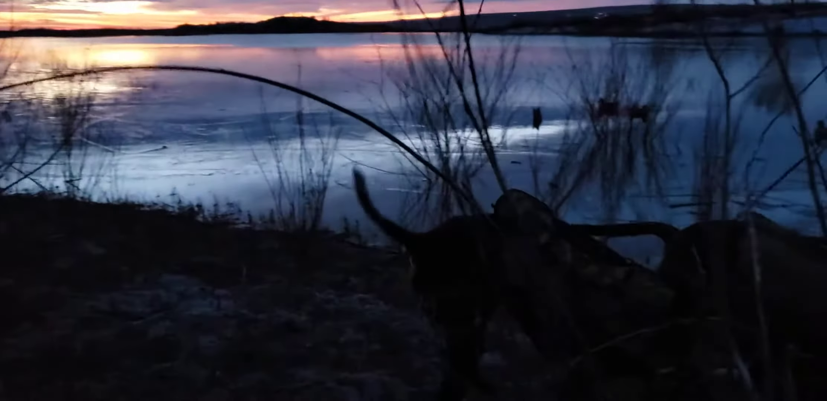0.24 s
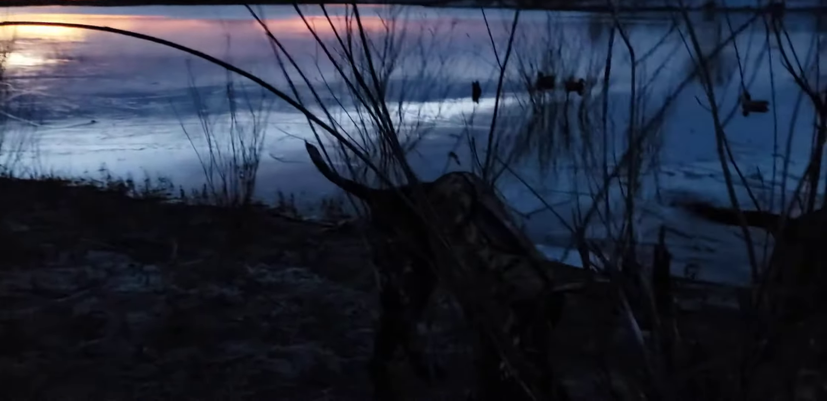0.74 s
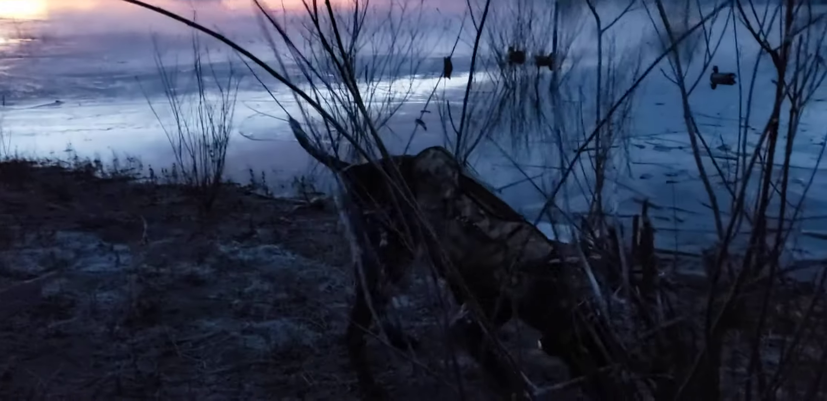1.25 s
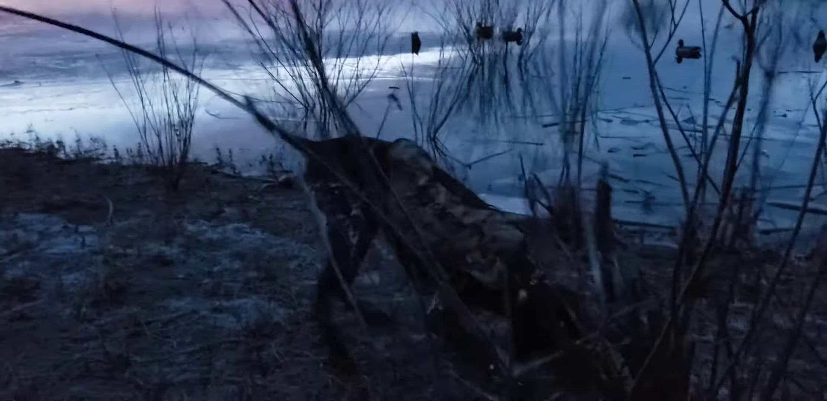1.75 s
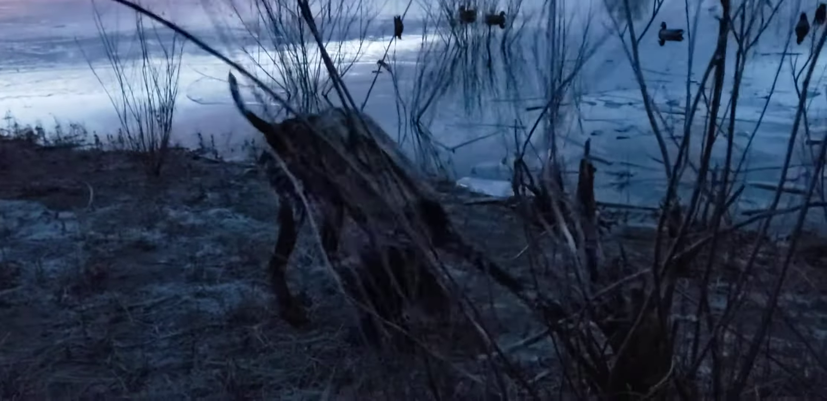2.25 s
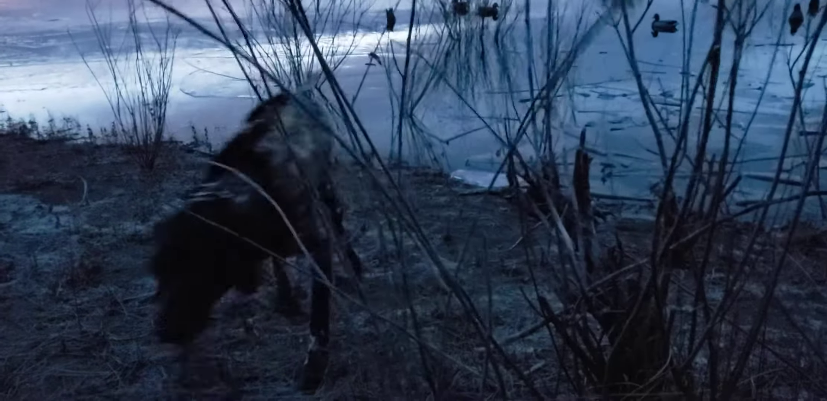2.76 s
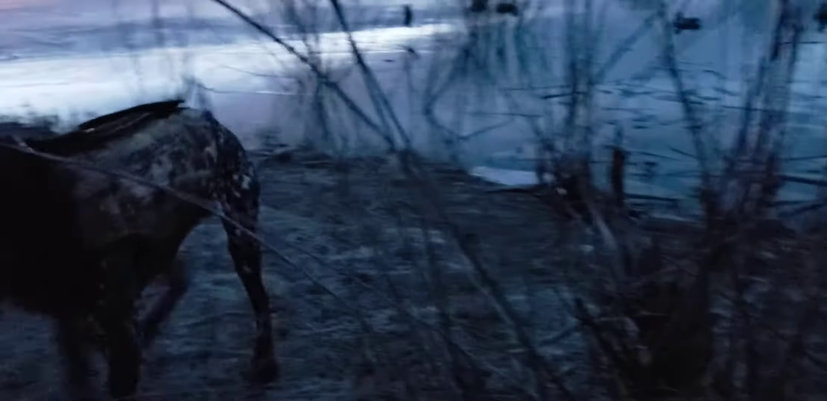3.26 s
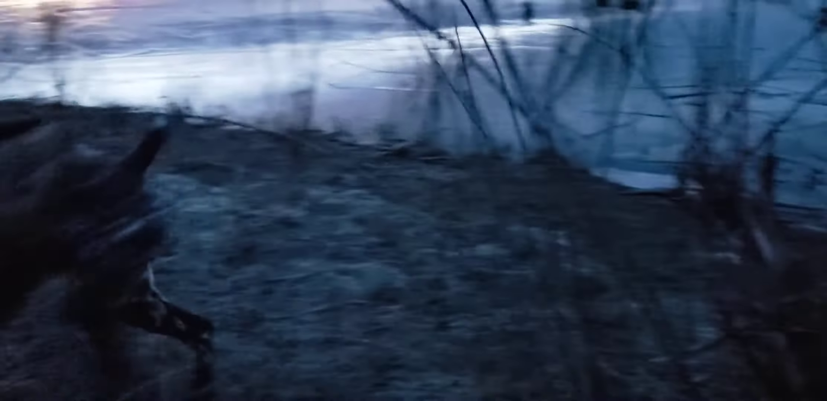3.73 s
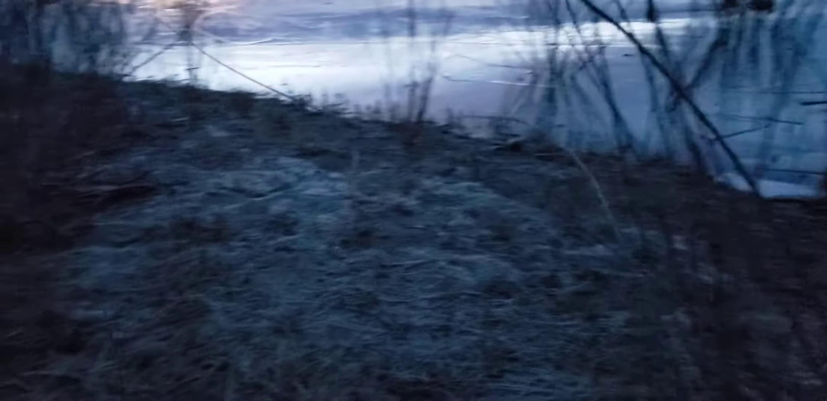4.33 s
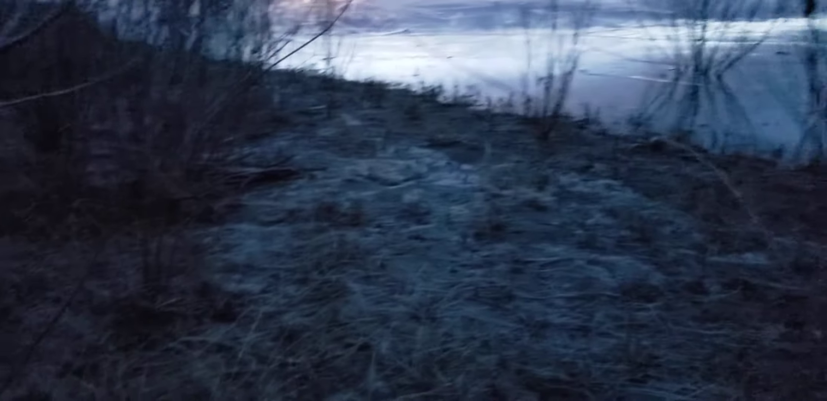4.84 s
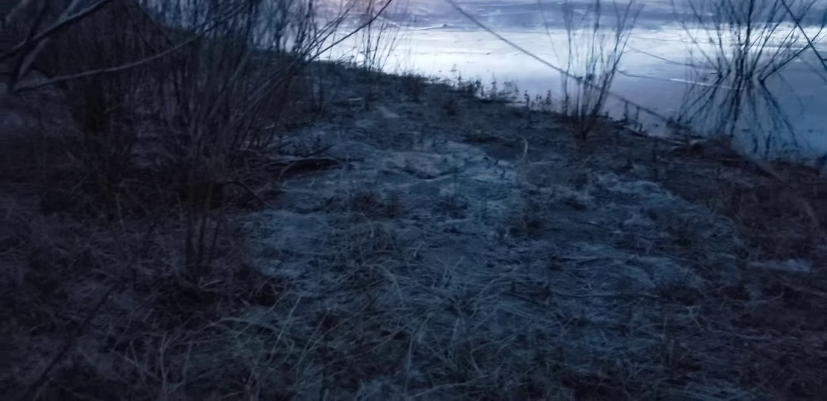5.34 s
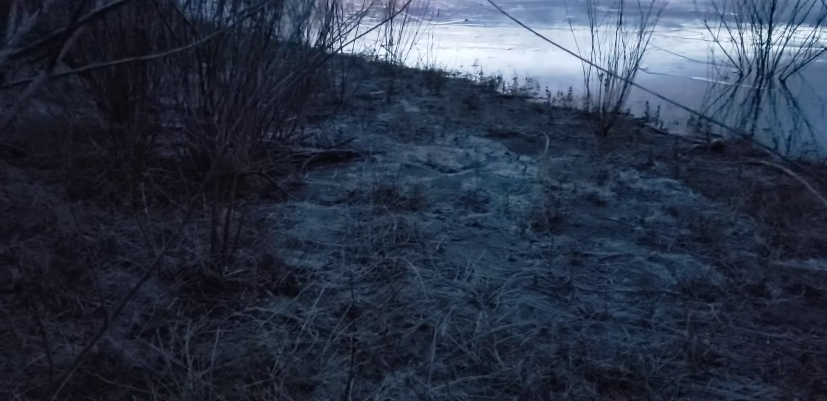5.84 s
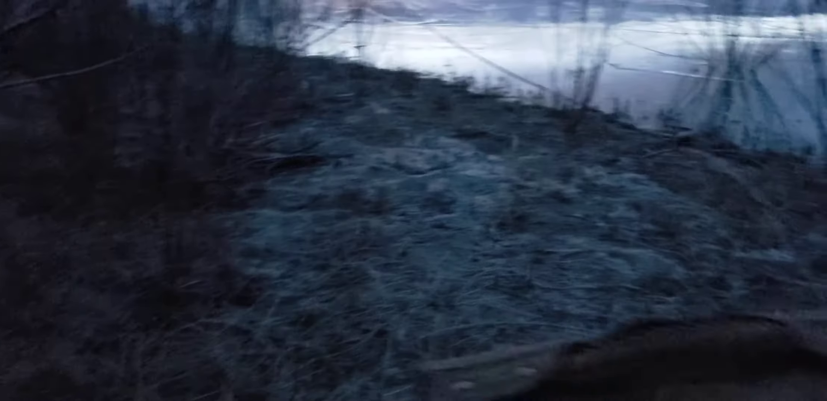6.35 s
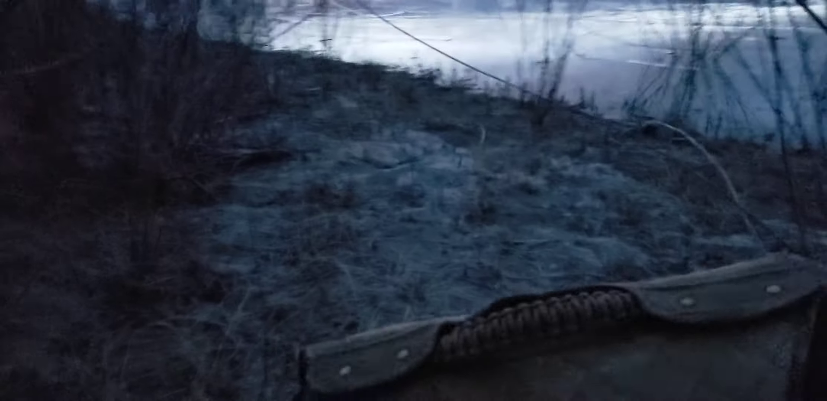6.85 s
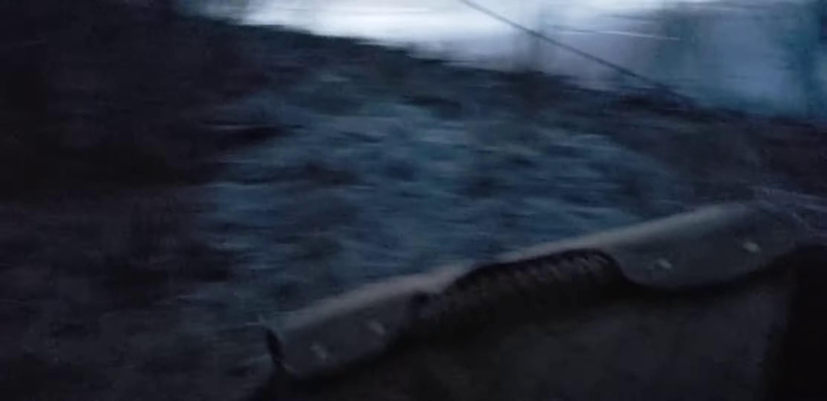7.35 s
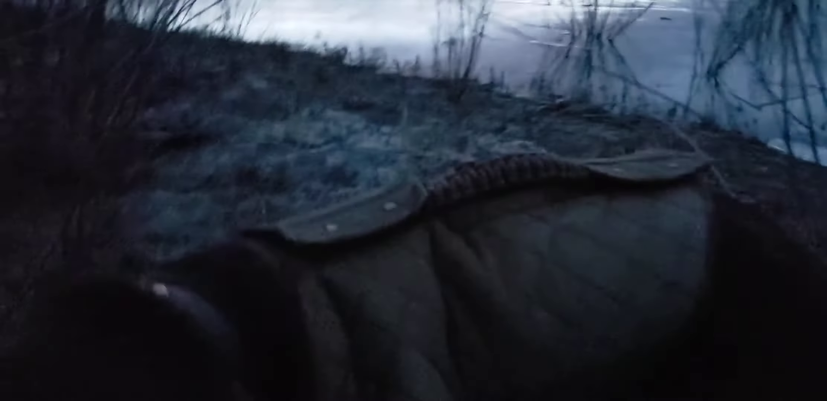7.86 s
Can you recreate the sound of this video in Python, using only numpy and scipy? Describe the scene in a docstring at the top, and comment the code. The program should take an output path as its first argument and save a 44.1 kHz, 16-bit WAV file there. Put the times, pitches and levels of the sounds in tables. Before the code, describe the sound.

Outdoors on a still, frosty shore, dogs push through stiff grass and dry brush close to hand-held stereo microphones. From 0 to 1.5 s there is light, bright rustling, small twig snaps and soft low thumps. At about 1.7 s one sharp, loud crack lands with a heavy thump and a trail of smaller snaps, thinning into a quieter stretch from 2.3 to 3 s. Around 3.15 and 3.3 s stems tear and pop. From 3.6 to 4.5 s crackling becomes dense and brittle, reaching the left microphone first, with strong snaps near 4.8 and 4.9 s. From 5 to 7 s uneven crunches and icy sizzle come in smaller pushes, with dull thumps beneath. Rustling swells again after 7 s; a hollow coat rub and deeper thump stand out near 7.75 s, ending around 8 s. Faint air and hiss remain throughout.

```python
"""Dogs push through frost-stiff grass and dry brush on a lake shore, close to a hand-held pair of microphones.
Blades and stems crackle in dense noise grains; single stems snap with a click, a sizzle and a ringing knock.
Paws and the carrier's moves thump low, coats rub along stems, thick stems pop, and air and hiss lie beneath.
The brush stays near the front, reaches the left microphone clearly first from 3.5 s, then drifts back."""
import sys
import numpy as np
from scipy import signal
from scipy.fft import rfft, irfft, next_fast_len
from scipy.io import wavfile
from scipy.ndimage import uniform_filter1d

SR = 44100
rng = np.random.default_rng(int(sys.argv[2]) if len(sys.argv) > 2 else 0)


def bounce(signal):
    """Save signal as a 16-bit WAV file at the path given by the first command-line argument."""
    frames = np.transpose(np.atleast_2d(signal))
    limited = np.clip(frames, -1, 1)
    pcm = np.round(limited * 32767).astype(np.int16)
    wavfile.write(sys.argv[1], SR, pcm)


N = 356769


def amp(db):
    """Amplitude for a level in dB."""
    return 10 ** (np.asarray(db) / 20)


def unit(x):
    """x scaled to rms 1."""
    return x / np.sqrt(np.mean(x ** 2) + 1e-20)


def curves(rows):
    """One value per sample for each column after the time."""
    s, *cols = np.transpose(rows)
    return [np.interp(np.arange(N) / SR, s, c) for c in cols]


def along(points, hz):
    """(Hz, value) points read on a log frequency axis."""
    f, v = np.transpose(points)
    return np.interp(np.log(hz + 1), np.log(f + 1), v)


def filtered(x, response):
    """x times a response of frequency."""
    m = next_fast_len(N + 8192)
    return irfft(rfft(x, m) * response(np.fft.rfftfreq(m, 1 / SR)), m)[..., :N]


def coloured(x, spectrum):
    """x shaped by (Hz, dB) points; white noise keeps its rms."""
    return filtered(x, lambda hz: unit(amp(along(spectrum, hz))))


def sides(db):
    """Left and right gains for a level difference."""
    return amp(np.array([db, -db]) / 2)


def pair(alike, lead_ms):
    """White noise at two microphones: a shared part, lead_ms earlier on the left, and a part of their own."""
    alike = np.clip(alike, 0, 1)
    shared = rng.standard_normal(N + 200)
    at = np.arange(N) + 100
    lead = np.round(lead_ms * SR / 1000).astype(int)
    both = np.array([shared[at + lead], shared[at]])
    return np.sqrt(alike) * both + np.sqrt(1 - alike) * rng.standard_normal((2, N))


def grains(per_s, spread_db, t60, bed, rise=.001):
    """Envelope of rms 1: many small breaks, a few of them strong, each dying away, over a smooth bed."""
    chance, size = rng.random((2, N))
    starts = (chance < per_s / SR) * amp(-spread_db * np.log(size + .035)) ** 2
    power = signal.lfilter([1], [1, -amp(-120 / (t60 * SR))], starts)
    power = np.abs(uniform_filter1d(power, size=1 + int(rise * SR)))  # softens each onset
    return unit(np.sqrt(power / power.mean() + bed))


def swells(s, db, rise_s, fade_s):
    """Power of events that rise to their level and fade, evenly in dB: 10 dB in rise_s or fade_s."""
    step = 44  # samples between computed points
    gap = np.arange(0, N + step, step) / SR - np.c_[s]
    fall_db = 10 * np.maximum(gap / np.c_[fade_s], -gap / np.c_[rise_s])
    power = amp(np.c_[db] - fall_db) ** 2
    return np.interp(np.arange(N) / step, np.arange(power.shape[1]), power.sum(0))


def air():
    """Still air and microphone hiss: steady coloured noise, mostly different at each microphone."""
    # colour of air and hiss: (frequency [Hz], relative level [dB])
    air_colour = [(18, -89), (30, 19), (81, -5.5), (251, 4.5), (425, -21), (3750, -46), (6690, 11),
                  (8250, -38), (11300, 4.5), (15900, -25)]
    level_db = -68
    return amp(level_db) * coloured(pair(.2, np.zeros(N)), air_colour)


def thumps():
    """Blows as swelling low noise: lumpy thumps and a deeper rumble that is less alike at the two microphones."""
    # low blows of paws and of the hand on the microphones:
    # (loudest at [s], thump level [dB], rumble level [dB], thump's 10 dB rise [s], thump's 10 dB fade [s])
    blows = [(0.116, -54, -55, 0.041, 0.094), (0.376, -58, -69, 0.129, 0.166),
             (0.62, -60, -62, 0.132, 0.184), (0.82, -61, -57, 0.046, 0.089),
             (0.957, -60, -54, 0.093, 0.051), (1.146, -66, -57, 0.027, 0.048),
             (1.435, -70, -65, 0.146, 0.05), (1.517, -65, -58, 0.013, 0.063),
             (1.667, -43, -43, 0.014, 0.099), (1.917, -57, -58, 0.04, 0.071),
             (2.251, -64, -66, 0.049, 0.062), (2.646, -62, -61, 0.146, 0.061),
             (2.798, -55, -56, 0.031, 0.054), (2.915, -56, -63, 0.023, 0.03),
             (3.06, -58, -51, 0.023, 0.029), (3.141, -51, -61, 0.09, 0.08), (3.338, -56, -49, 0.056, 0.142),
             (3.578, -58, -54, 0.026, 0.028), (3.765, -55, -52, 0.076, 0.039),
             (3.866, -59, -64, 0.022, 0.079), (4.016, -57, -63, 0.018, 0.1),
             (4.304, -56, -53, 0.094, 0.081), (4.519, -53, -55, 0.147, 0.028),
             (4.649, -58, -57, 0.046, 0.067), (4.821, -54, -62, 0.045, 0.071),
             (4.926, -59, -58, 0.017, 0.158), (5.077, -60, -60, 0.01, 0.109),
             (5.282, -58, -56, 0.076, 0.024), (5.429, -53, -51, 0.025, 0.059),
             (5.531, -53, -49, 0.038, 0.027), (5.724, -85, -62, 0.15, 0.025),
             (5.911, -61, -56, 0.072, 0.076), (6.014, -54, -85, 0.019, 0.2),
             (6.303, -54, -65, 0.113, 0.149), (6.582, -56, -73, 0.108, 0.2),
             (6.857, -53, -65, 0.149, 0.118), (6.93, -58, -54, 0.037, 0.026), (7.027, -52, -58, 0.135, 0.1),
             (7.284, -54, -69, 0.15, 0.076), (7.423, -56, -56, 0.135, 0.056),
             (7.741, -48, -51, 0.147, 0.138), (7.866, -72, -45, 0.093, 0.025),
             (8.036, -57, -45, 0.032, 0.075)]
    # colour of paws on hard ground: (frequency [Hz], relative level [dB])
    thump_colour = [(53, -20), (90, 0.5), (243, -1), (367, -11.5), (420, -14), (550, -29), (920, -120)]
    # colour of the rumble: (frequency [Hz], relative level [dB])
    rumble_colour = [(15, -40), (25, -15.5), (59, 6.5), (110, -3.5), (140, -20), (240, -120)]
    thump_rest_db, rumble_rest_db = -73, -81  # between blows
    rumble_pace = 1.4  # the rumble's times over those of the thump

    s, thump_db, rumble_db, *times = np.transpose(blows)
    thump = np.sqrt(swells(s, thump_db, *times) + amp(thump_rest_db) ** 2)
    rumble_power = swells(s, rumble_db, *np.multiply(times, rumble_pace))
    rumble = np.sqrt(rumble_power + amp(rumble_rest_db) ** 2)
    lumps = thump * grains(per_s=25, spread_db=3, t60=0.11, bed=0.6, rise=0.021)
    knocking = coloured(lumps * pair(0.94, np.full(N, .36)), thump_colour)
    return knocking + coloured(rumble * pair(0.52, np.full(N, .4)), rumble_colour)


def rubs():
    """A coat drags along a stem: lumpy friction noise inside one hollow resonance."""
    # each rub: (loudest at [s], level [dB], 10 dB rise [s], 10 dB fade [s], resonance [Hz], width [Hz])
    drags = [(0.4, -60, .17, .05, 646, 200), (0.4, -70, .2, .06, 2940, 170),
             (3.14, -53, .08, .06, 400, 250), (7.745, -44, .075, .035, 650, 700)]
    out = np.zeros((2, N))
    for s, db, rise_s, fade_s, hz, width_hz in drags:
        resonance = lambda f: 1 / (1 + ((f * f - hz * hz) / (f * width_hz + 1)) ** 2)
        hollow = filtered(pair(.8, np.zeros(N)), resonance)
        lumps = grains(per_s=80, spread_db=2, t60=.04, bed=1.2, rise=.004)
        out += np.sqrt(swells([s], [db], [rise_s], [fade_s])) * lumps * unit(hollow)
    return out


def pops():
    """Thick stems give way in one quick swing of pressure that hardly rings."""
    # each pop: (start [s], level before its decay [dB], pitch [Hz])
    swings = [(1.6605, -22, 1300), (3.158, -19, 1700), (3.3102, -20, 1700), (4.8102, -22, 3000),
              (7.754, -31, 1300), (8.035, -38, 700)]
    decay_cycles = .9  # cycles to fall to 1/e
    t = np.arange(SR // 50) / SR
    out = np.zeros(N + len(t))
    for s, db, hz in swings:
        swing = np.sin(2 * np.pi * hz * t) * np.exp(-hz * t / decay_cycles)
        out[round(s * SR):][:len(t)] += amp(db) * swing
    return out[:N]


def ticks(level_db, per_s, hz, cycles):
    """Small twigs and ice flakes, each a short decaying sine at its own pitch and strength."""
    at, pitch, size = rng.random((round(per_s * N / SR), 3)).T
    at = (at * (N - 1)).astype(int)
    t = np.arange(400)  # samples
    f = (hz * np.exp(1.2 * (pitch - .5)) / SR)[:, None]  # cycles per sample
    level = amp(level_db[at] - 3 * np.log(size + 0.03))[:, None]
    ring = np.sin(2 * np.pi * f * t) * np.exp(-f * t / cycles) * level
    return np.bincount((at[:, None] + t).ravel(), ring.ravel(), N + len(t))[:N]


def snaps():
    """Left-right envelopes of crackle and sizzle for snaps and tears, and the resonant knock of each stem."""
    # snapping stems: (start [s], reference level [dB], sizzle re reference [dB], knock re reference [dB],
    # knock pitch [Hz], sizzle t60 [s], left-right difference [dB])
    stems = [(0.48, -34.5, -13, -9, 634, 0.046, 8), (0.539, -48.5, -17, 4, 670, 0.03, 3),
             (0.6953, -39, -1, -9, 960, 0.06, 3), (0.7194, -24, -2, -26, 6500, 0.036, 5.5),
             (0.75, -30, -14, -10, 816, 0.046, 5), (0.819, -41, -11, -3, 1100, 0.035, 5),
             (0.8671, -29, -3, -14, 6800, 0.055, 5), (0.9045, -29, 0, -12, 6500, 0.04, 6),
             (0.9637, -39, -9, -1, 800, 0.026, -2), (0.9986, -32, -14, -19.5, 910, 0.082, 5),
             (1.0294, -36.5, -16, -5, 1800, 0.05, 8), (1.0475, -26, -17, -12, 3100, 0.033, 5),
             (1.3813, -27, -19, -11.5, 770, 0.033, 4), (1.3932, -23.5, -9, -24, 729, 0.036, 4),
             (1.6592, -9, -16, -19, 560, 0.044, 6), (1.7195, -18, -19, -15.5, 590, 0.028, 0),
             (1.757, -30.5, -4.5, -17, 810, 0.035, -11), (1.8008, -21.5, -7.5, -26, 2940, 0.04, 0.0),
             (1.8422, -23, -7, -20, 2180, 0.042, 2), (1.8656, -21.5, -6, -28, 2930, 0.035, -1),
             (1.962, -27, -10, -30, 2500, 0.03, 2), (1.9876, -25.5, -2, -25, 2220, 0.031, -1),
             (2.0384, -30, -15, -28, 1750, 0.035, 4), (2.0788, -28, -10, -38, 2550, 0.031, 8.5),
             (2.1207, -28.5, -21, -34, 2960, 0.034, 11), (2.156, -27, -18, -33, 2240, 0.037, 16),
             (2.5187, -37, -13, -29, 2020, 0.047, 5), (2.572, -40, -3.5, -45, 767, 0.11, -0.5),
             (2.9956, -38, -3, -55, 721, 0.041, 1), (3.1455, -17.5, -9, -11, 1880, 0.037, -7),
             (3.1565, -13, -9, -13, 1980, 0.022, -3), (3.291, -27, -16, -13, 2270, 0.035, -3.0),
             (3.3028, -19, -5, -12, 1230, 0.033, -4), (3.3057, -19, -15, -16, 1840, 0.03, -5),
             (3.4565, -30, -14, -30, 2500, 0.02, 2), (3.5725, -32, -14, -20, 2000, 0.025, 2),
             (3.6694, -26.5, -14, -35, 2160, 0.028, 12), (3.683, -20, -14, -23, 690, 0.042, -1),
             (3.7104, -15.5, -16, -17, 2670, 0.029, -0.5), (3.73, -19, -12, -25, 3800, 0.018, 2),
             (3.738, -19, -10, -25, 2200, 0.04, 2), (3.7575, -16, -23, -32, 1910, 0.035, 3),
             (3.768, -19, -14, -25, 2000, 0.018, 2), (3.8264, -22.5, -13, -26, 2610, 0.063, 3),
             (3.8535, -16.5, -19, -19.5, 1980, 0.039, 3), (3.951, -26, -6, -33, 2120, 0.082, 3),
             (3.9784, -21, -10, -32, 1720, 0.061, -1), (4.011, -27, -6, -35, 2500, 0.02, 1),
             (4.0448, -17, -4, -41, 2410, 0.052, 2.5), (4.0642, -12.5, -8, -34, 2370, 0.034, 1),
             (4.091, -21.5, -3, -41, 2090, 0.037, -1), (4.1355, -30, -11, -31, 1950, 0.035, -4),
             (4.145, -16.5, -11, -39, 2470, 0.032, 0.5), (4.1876, -26.5, -6, -28, 2350, 0.061, 4),
             (4.227, -14.5, -2, -19.5, 2130, 0.026, 0), (4.2355, -20, -3, -30, 2130, 0.015, 0),
             (4.242, -30, -10, 3, 4830, 0.03, 0), (4.27, -19, -1, -20, 2500, 0.022, 2),
             (4.334, -18, -2, -35, 2860, 0.022, 0), (4.399, -24, -5, -35, 2500, 0.03, 1),
             (4.489, -25, -2, -35, 2500, 0.022, 1), (4.7235, -28, -5, -23, 1940, 0.038, 1.0),
             (4.8092, -22.5, -31, -14, 1880, 0.048, -3), (4.9145, -10.5, -22, -20.5, 2600, 0.038, 1),
             (5.1352, -28, -6, -35, 2640, 0.11, -2), (5.3433, -27, -15, -20, 2550, 0.032, -5),
             (5.4251, -29.5, -6, -27, 2440, 0.044, 1.0), (5.803, -25, -9, -34, 2670, 0.044, 4),
             (5.8192, -21, -5, -25, 2430, 0.042, 2), (6.048, -33, -10, -20, 3000, 0.025, 1),
             (6.102, -30, -13, -6, 2570, 0.035, 1.0), (6.146, -40, -10, 2, 2850, 0.025, 1),
             (6.24, -24.5, -15, -17, 2250, 0.11, 0.0), (6.6378, -30, -6, -35, 2860, 0.041, 2),
             (6.661, -30, -12, -20, 2800, 0.025, 1), (6.8389, -32, -6, -17, 775, 0.038, 8),
             (6.8852, -25, -6, -37, 549, 0.028, 1), (7.0626, -32, -10, -12, 581, 0.033, -10),
             (7.1252, -28, -21, -23.5, 2890, 0.021, -3), (7.154, -28, -12, -20, 2800, 0.025, -2),
             (7.3158, -30, -28, -2, 2480, 0.032, -14), (7.3576, -26.5, -4, -35, 2090, 0.032, -4.5),
             (7.3758, -21.5, -5, -32, 2950, 0.04, -4), (7.392, -22.5, -4, -24, 627, 0.047, 0),
             (7.417, -24, 0, -30, 2300, 0.029, -3.5), (7.441, -27.5, -12, -6, 2400, 0.039, 0.5),
             (7.532, -27, -12, -13, 2000, 0.025, -2), (7.5952, -30.5, -9, -20, 2550, 0.038, -4),
             (7.7523, -19, -25, -18, 645, 0.054, -5), (7.799, -32, -15, -12, 1500, 0.025, -2),
             (7.9185, -26.5, -11, -14, 2480, 0.033, 0)]
    # stems torn close by, a rasp that stops short: (start [s], end [s], crackle level [dB], sizzle level [dB])
    torn = [(3.137, 3.167, -37, -31), (3.292, 3.316, -39.5, -26.5)]

    t = np.arange(SR // 8) / SR
    clicks = np.zeros((2, 2, N + len(t)))  # crackle or sizzle, left or right, time
    splinters = np.zeros_like(clicks)
    knocks = np.zeros(N + len(t))
    noise = rng.standard_normal((len(stems), len(t)))
    for (s, db, sizzle_db, knock_db, hz, t60, pan_db), shake in zip(stems, noise):
        at = slice(round(s * SR), round(s * SR) + len(t))
        level = amp([[[db - 14]], [[db + sizzle_db]]]) * sides(pan_db)[:, None]
        # the stem breaks with a click, stronger for a brittle, short snap
        click = amp(-60 * (t - .001) / .005) * (t > .001)
        clicks[..., at] += (1.6 * min(.038 / t60, 1.45) * level * click) ** 2
        # fibres give way and swell, then splinters die away
        splinter = amp(-60 * t / t60) * (1 - np.exp(-t / 0.0033))
        splinters[..., at] += (1.33 * level * splinter) ** 2
        # the knock is noise ringing at the stem's pitch
        ring = unit(signal.lfilter(*signal.iirpeak(hz, 5, SR), shake))
        fade = amp(-60 * t / (1.2 * t60)) * (1 - np.exp(-t / 0.0018))
        knocks[at] += amp(db + knock_db - 2.5) * ring * fade
    for start, end, *db in torn:
        splinters[..., round(start * SR):round(end * SR)] += amp(db)[:, None, None] ** 2
    uneven = grains(per_s=790, spread_db=1.0, t60=0.013, bed=0.85, rise=.0002)
    return np.sqrt(clicks[..., :N] + splinters[..., :N] * uneven ** 2), knocks[:N]


def effort():
    """Levels in dB of crackle, sizzle and scuff: every push swells over the rustle."""
    # uneven rustle between pushes:
    # (time [s], crackle level [dB], sizzle level [dB], scuff level [dB])
    rustle = [(0.0, -80, -64, -79), (0.645, -81, -62, -88), (1.143, -63, -62, -76), (1.775, -70, -55, -88),
              (2.285, -88, -57, -80), (2.964, -79, -75, -87), (3.422, -50, -47, -61),
              (4.027, -72, -68, -66), (4.486, -49, -41, -88), (5.291, -64, -60, -88),
              (5.735, -61, -57, -88), (6.422, -77, -49, -77), (7.105, -65, -61, -60),
              (7.621, -47, -45, -66), (8.09, -48, -44, -64)]
    # a paw or flank pushes into the brush: (loudest at [s], crackle level [dB], sizzle re crackle [dB],
    # scuff re crackle [dB], crackle's 10 dB rise [s], crackle's 10 dB fade [s])
    push_table = [(0.06, -54, 6, -18, 0.008, 0.16), (0.225, -55, 4, -9, 0.008, 0.14),
                  (0.393, -56, 4, -14, 0.107, 0.196), (0.75, -52, 2, -7, 0.038, 0.029),
                  (0.828, -58, -12, -5, 0.063, 0.04), (0.877, -53, 3, -13, 0.007, 0.098),
                  (1.03, -52, -4, -15, 0.063, 0.039), (1.387, -52, 4, -17, 0.004, 0.067),
                  (1.666, -38, 1, -10, 0.005, 0.225), (1.912, -46, 1, -11, 0.082, 0.094),
                  (2.176, -47, 1, -21, 0.2, 0.118), (2.619, -57, 5, -21, 0.049, 0.05),
                  (2.811, -63, 7, -13, 0.131, 0.035), (2.908, -61, 9, -17, 0.008, 0.04),
                  (3.103, -50, 5, -18, 0.099, 0.116), (3.227, -52, 6, -35, 0.017, 0.097),
                  (3.588, -46, -1, -11, 0.022, 0.072), (3.763, -41, 1, -13, 0.081, 0.024),
                  (3.87, -43, 3, -10, 0.073, 0.037), (4.003, -40, 4, -28, 0.057, 0.025),
                  (4.058, -42, 4, -19, 0.026, 0.172), (4.243, -41.5, 2, -18, 0.072, 0.356),
                  (4.441, -41, 4, -24, 0.178, 0.093), (4.669, -47, -1, -17, 0.025, 0.037),
                  (4.81, -35, 2, -10, 0.047, 0.125), (5.153, -48, 6, -35, 0.033, 0.106),
                  (5.26, -53, 5, -24, 0.068, 0.038), (5.36, -45, 2, -28, 0.022, 0.065),
                  (5.428, -55, 6, -15, 0.039, 0.097), (5.679, -50, 7, -35, 0.153, 0.048),
                  (5.821, -43, 3, -18, 0.022, 0.058), (5.94, -50, 2, -16, 0.053, 0.104),
                  (6.016, -48, 3, -13, 0.051, 0.121), (6.102, -50, 6, -14, 0.093, 0.05),
                  (6.267, -43, 0, -8, 0.103, 0.123), (6.458, -45, 3, -27, 0.032, 0.107),
                  (6.559, -50, -5, -11, 0.022, 0.299), (6.702, -54, 3, -10, 0.066, 0.035),
                  (6.846, -51, 3, -10, 0.155, 0.043), (7.0, -41, 0, -12, 0.138, 0.079),
                  (7.106, -42, 5, -23, 0.052, 0.081), (7.198, -42, 3, -18, 0.042, 0.114),
                  (7.409, -43, 5, -25, 0.042, 0.075), (7.63, -52, 11, -14, 0.029, 0.028),
                  (7.755, -45, 5, -6, 0.08, 0.06), (8.059, -58, 7, 4, 0.055, 0.027)]
    scuff_pace = .8  # the scuff's times over those of the crackle

    s, db, sizzle_db, scuff_db, *times = np.transpose(push_table)
    pushes = [swells(s, db, *times),
              swells(s, db + sizzle_db, *times),
              swells(s, db + scuff_db, *np.multiply(times, scuff_pace))]
    return [10 * np.log10(push + amp(rest_db) ** 2) for push, rest_db in zip(pushes, curves(rustle))]


def brush():
    """Grass and brush as grainy noise in three layers; snaps are more alike at both microphones than rustle."""
    # where the sound comes from: (time [s], lead of the left microphone [ms], left-right difference [dB])
    bearing = [(0, 0.08, 2.5), (1, 0.03, 1), (2, 0.011, 3.5), (2.6, 0.03, 3), (3.3, 0.044, 0.5),
               (3.55, 0.45, 2), (4, 0.44, 1), (5.8, 0.35, 1.5), (6.1, .26, 1), (7.3, 0.18, 1.5),
               (7.6, 0.008, 0), (8.09, 0.08, 0)]
    # frozen blades, strong near 7 kHz where the microphones ring: (frequency [Hz], relative level [dB])
    crackle_colour = [(820, -36), (1400, -17), (1880, -13), (2450, -8), (2980, -9), (4790, -5.5),
                      (5300, -5), (6750, 2), (8070, -6), (9000, -9), (11700, -5), (19800, -120)]
    # ice crystals breaking off: (frequency [Hz], relative level [dB])
    sizzle_colour = [(400, -38), (2200, -22), (4710, -15), (8000, -32), (9340, -8), (11400, 1),
                     (15100, 8.5), (15700, -3)]
    # coats and paws dragging through: (frequency [Hz], relative level [dB])
    scuff_colour = [(190, -17), (330, -9), (492, -5.5), (662, -4), (951, -5.5), (1140, -8), (1240, -8.5),
                    (1500, -10), (1950, -13), (3300, -120)]
    # thick blades fall back by thick_drops dB for each dB of crackle below firm_db
    firm_db, thick_drops = -52, .45

    crackle_db, sizzle_db, scuff_db = effort()
    lead_ms, pan_db = curves(bearing)
    # crackle and sizzle share some breaks and have others of their own
    common = grains(per_s=170, spread_db=4, t60=.013, bed=1.7, rise=.0015) * sides(pan_db)
    (bright, fine), knocks = snaps()

    def own():
        """Breaks heard in one layer only."""
        return grains(per_s=90, spread_db=4, t60=0.15, bed=1.0, rise=0.00067)

    def blades():
        """Crackling noise of one kind of blade."""
        return amp(crackle_db) * common * own() * pair(0.15, lead_ms)

    def thick(hz):
        """Share of power from thick blades, which sound low; thin ones sound high."""
        return 1 / (1 + (hz / 4400) ** 6)

    # a light touch breaks few thick blades
    firm = amp(thick_drops * np.clip(crackle_db - firm_db, -12, 2))
    low = filtered(firm * blades(), lambda hz: np.sqrt(thick(hz)))
    high = filtered(blades(), lambda hz: np.sqrt(1 - thick(hz)))
    crackle = low + high + bright * pair(0.36, lead_ms)

    sizzle = amp(sizzle_db) * common * own() * pair(.2, lead_ms)
    sizzle = sizzle + fine * pair(0.23, lead_ms)

    scuff_grains = grains(per_s=70, spread_db=1, t60=0.03, bed=1.0, rise=0.0085)
    scuff = amp(scuff_db) * scuff_grains * pair(0.69, lead_ms)

    # knocks and ticks reach the right microphone later
    rings = knocks + ticks(crackle_db - 5.5, per_s=70, hz=3600, cycles=6)
    late = np.arange(N) - np.round(lead_ms * SR / 1000).astype(int)
    rings = np.array([rings, rings[np.clip(late, 0, N - 1)]])

    layers = coloured(crackle, crackle_colour) + coloured(sizzle, sizzle_colour)
    return layers + coloured(scuff, scuff_colour) + rings


def scene():
    """All layers, from the still air up to the brush."""
    return air() + thumps() + rubs() + pops() + brush()


def record(dry):
    """Each microphone has its colour; little passes above the shelf and nothing above the band limit."""
    # the two microphones differ in colour: (frequency [Hz], left-right difference [dB])
    mic_colour = [(30, 0), (60, -2), (130, -2.5), (290, -1), (640, 3.0), (1410, 2.5), (3100, -1), (6820, 2),
                  (15000, -2.5)]
    shelf_hz, top_hz = 15850, 16984

    def response(hz):
        """Left and right gains at each frequency."""
        shelf = amp(-36 * (hz > shelf_hz)) * (hz < top_hz)
        return sides(along(mic_colour, hz)) * shelf

    return filtered(dry, response)


dry = scene()
out = record(dry)
bounce(out)
```